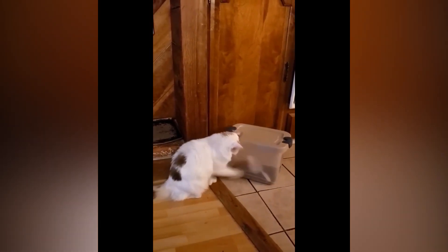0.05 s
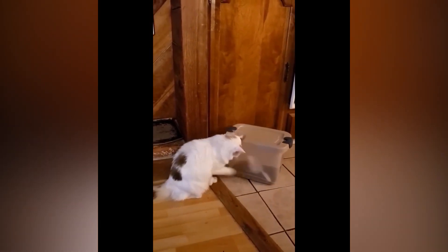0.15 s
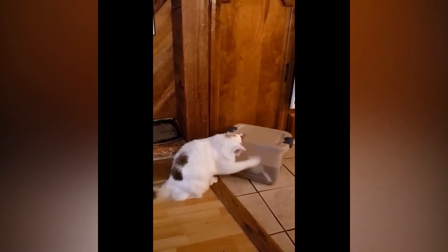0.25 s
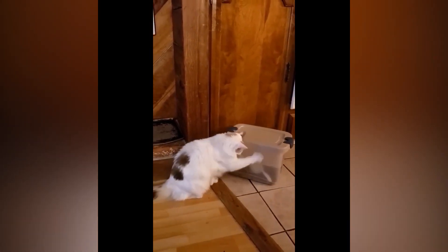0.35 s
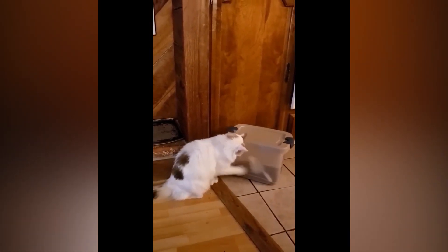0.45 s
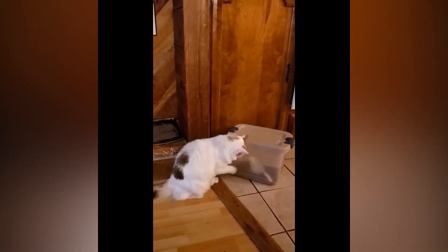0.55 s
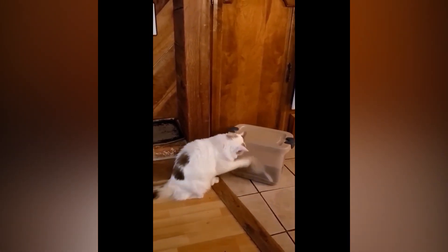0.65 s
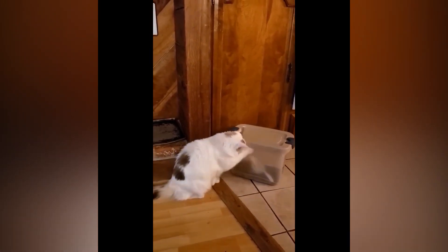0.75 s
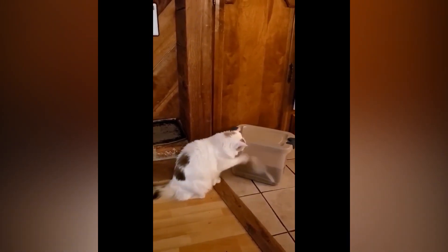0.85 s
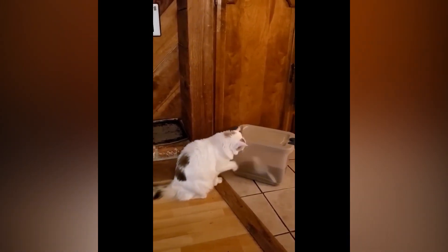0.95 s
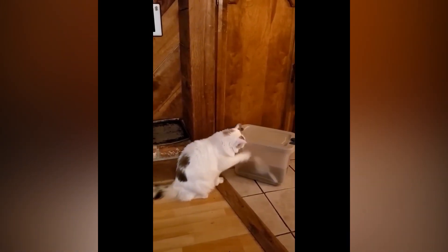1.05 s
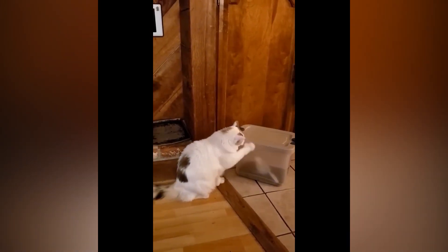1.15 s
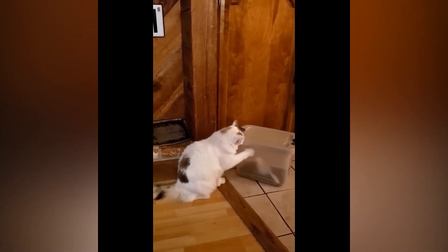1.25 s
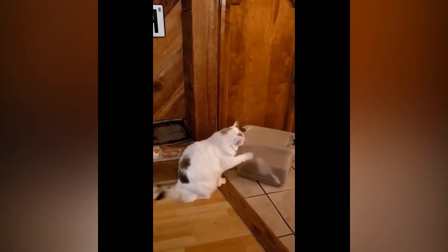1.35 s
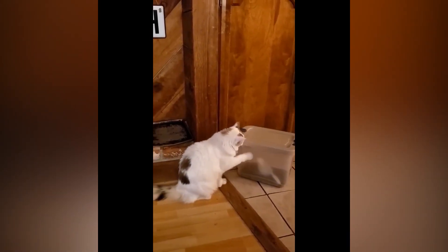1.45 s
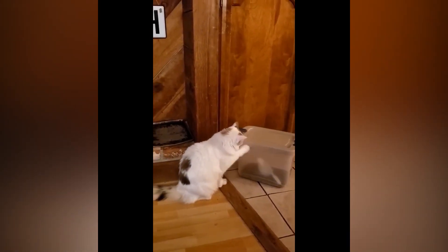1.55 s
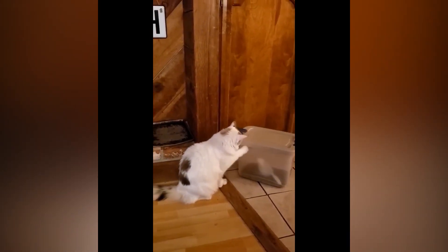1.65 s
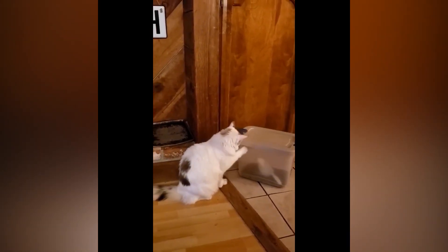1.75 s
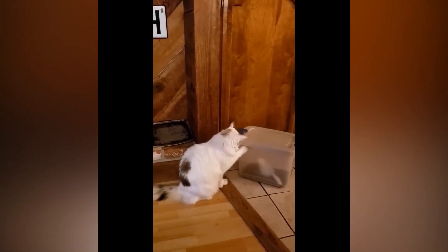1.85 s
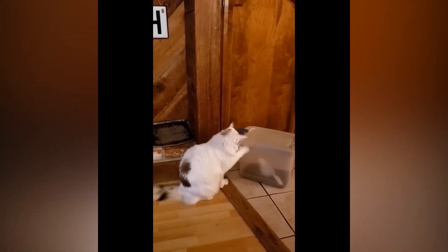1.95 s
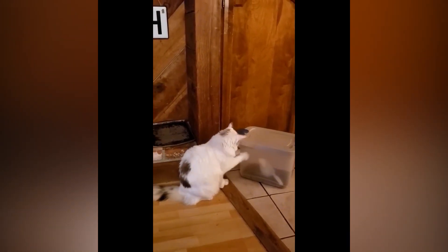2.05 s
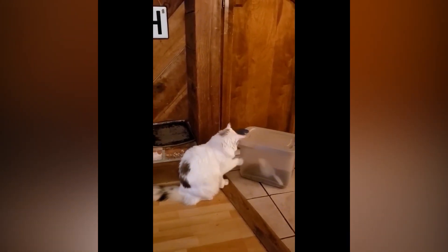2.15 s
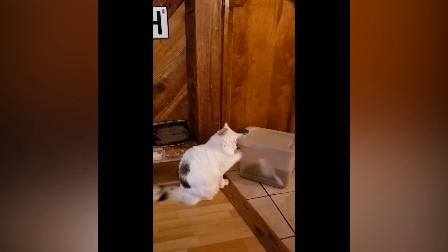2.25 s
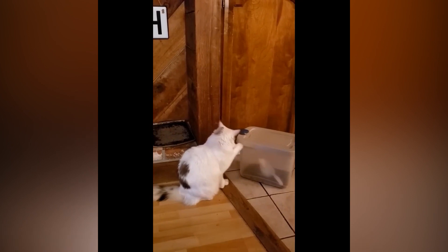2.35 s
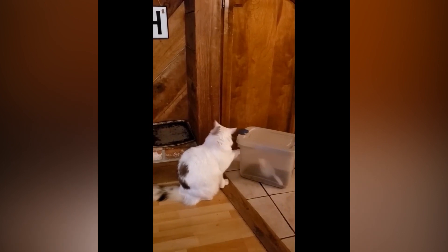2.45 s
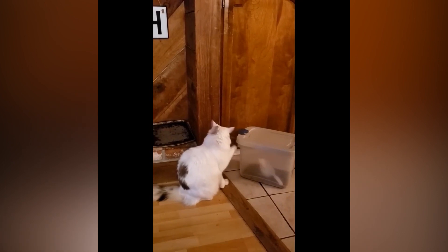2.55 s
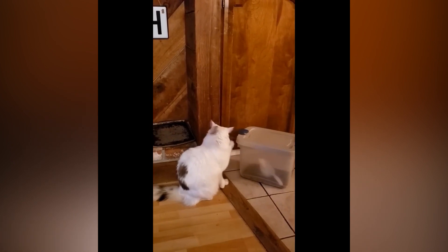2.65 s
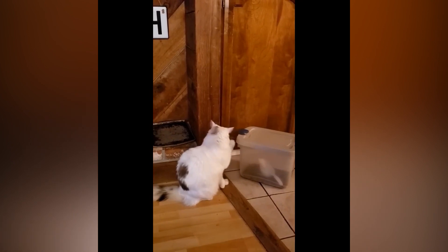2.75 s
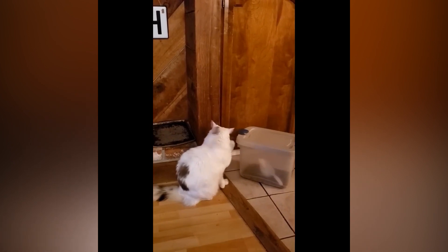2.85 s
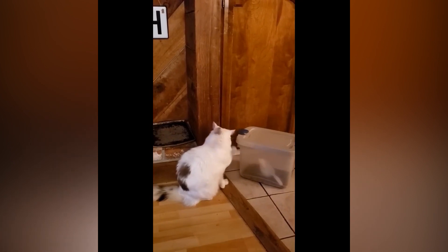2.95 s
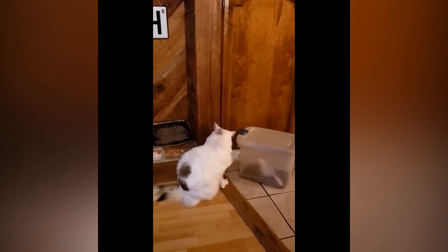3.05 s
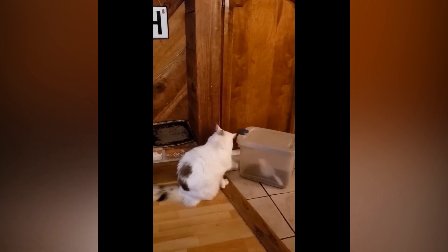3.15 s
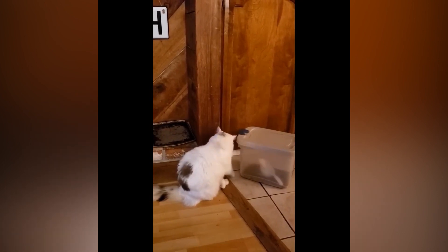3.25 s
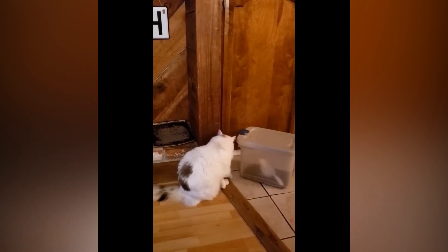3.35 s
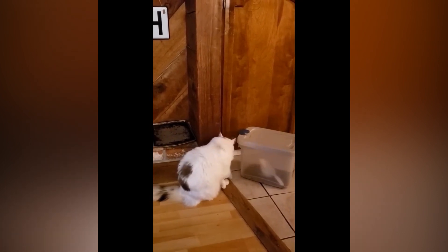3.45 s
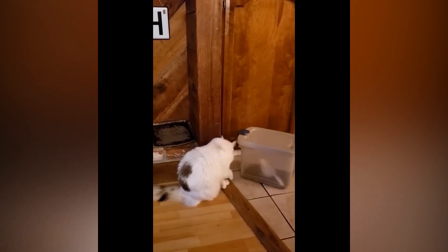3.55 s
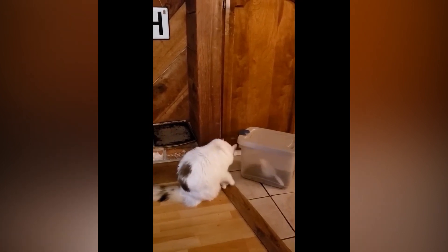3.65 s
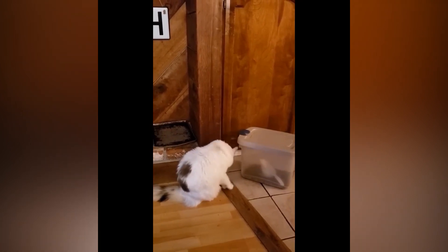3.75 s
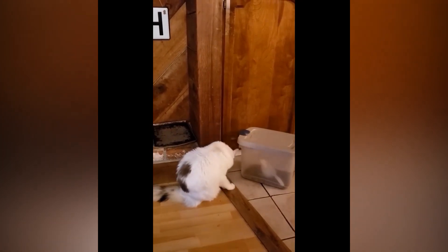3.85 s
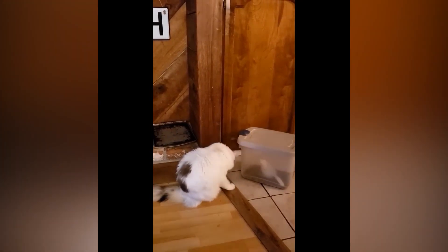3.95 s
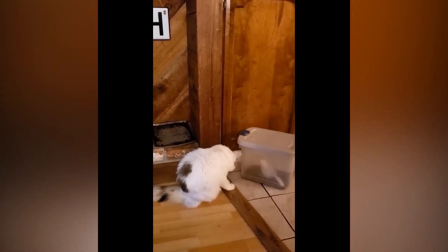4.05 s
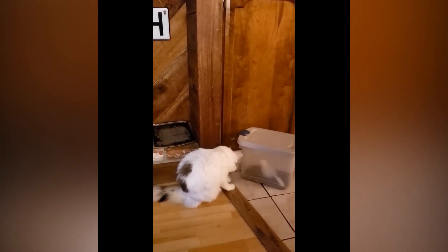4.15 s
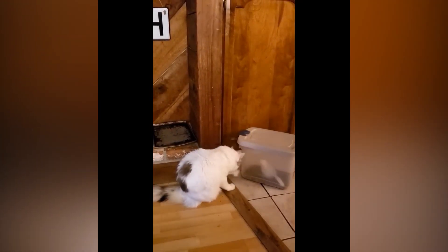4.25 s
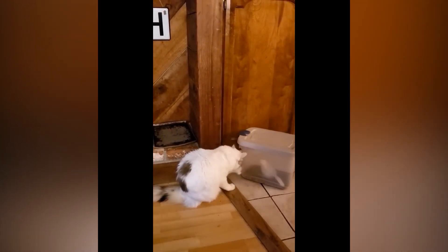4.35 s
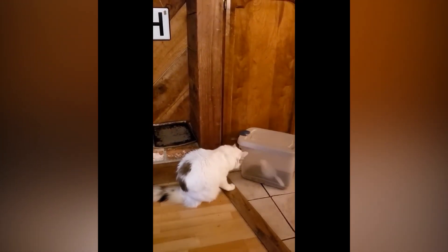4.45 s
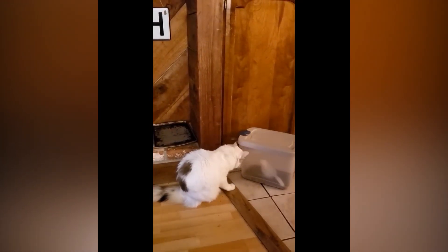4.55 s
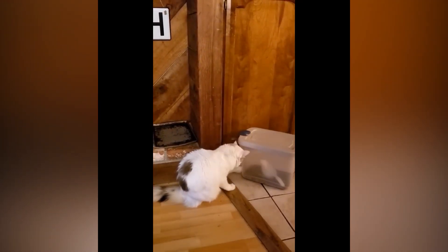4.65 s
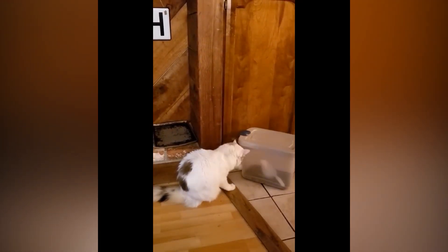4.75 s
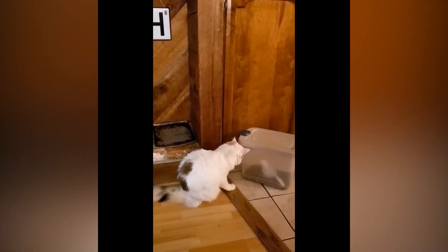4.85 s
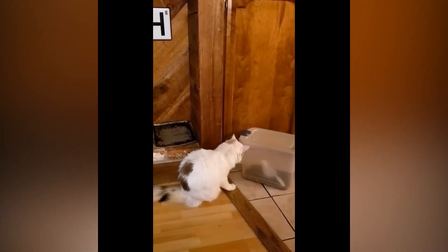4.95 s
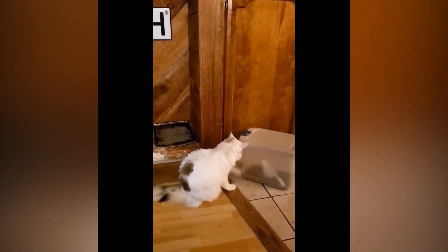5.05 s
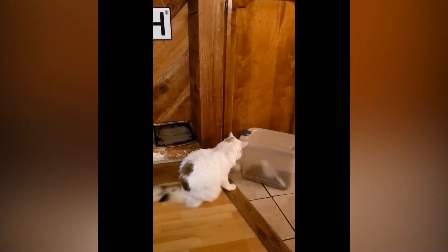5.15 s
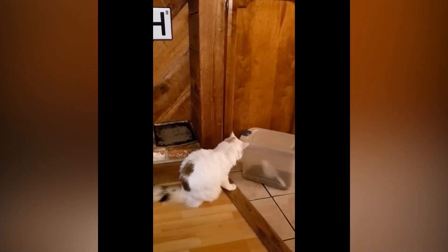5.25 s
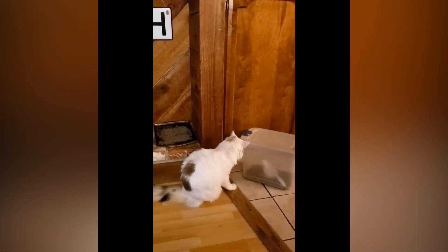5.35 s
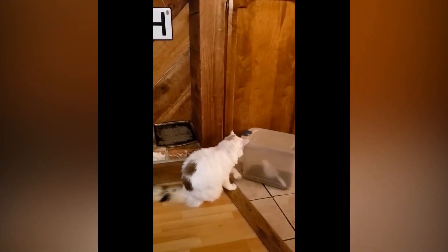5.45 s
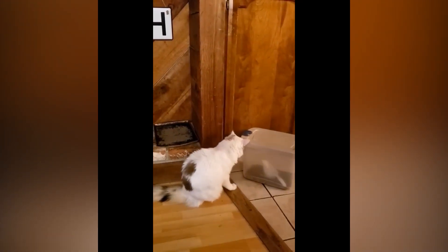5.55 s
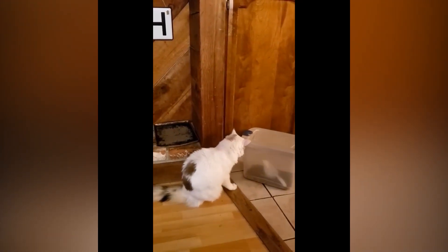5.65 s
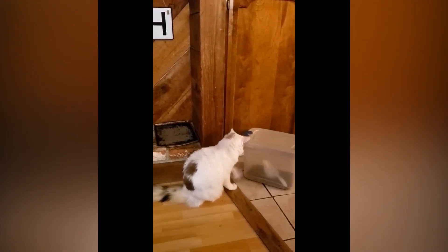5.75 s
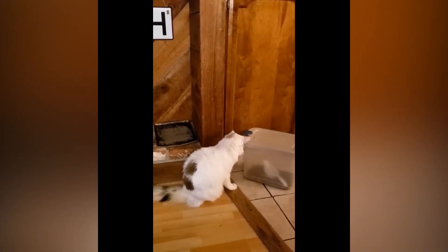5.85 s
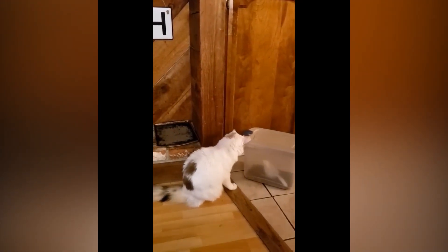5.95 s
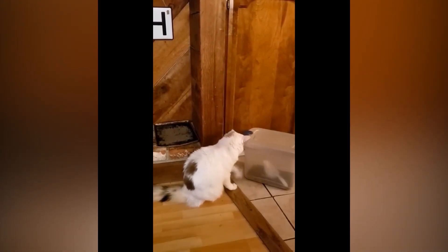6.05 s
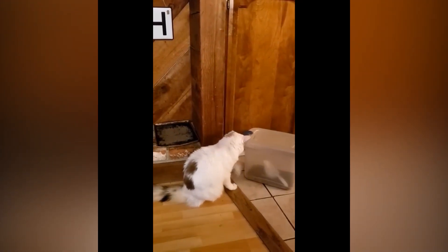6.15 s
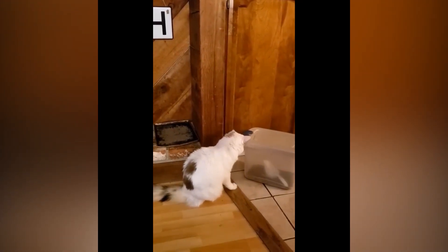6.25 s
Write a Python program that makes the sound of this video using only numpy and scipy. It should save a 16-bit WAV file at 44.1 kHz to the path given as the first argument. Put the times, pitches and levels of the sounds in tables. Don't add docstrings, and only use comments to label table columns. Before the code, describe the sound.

A cat paws a hollow plastic storage bin on a tiled floor. A rapid burst of booming knocks, claw ticks and short scrapes opens, followed by sparse taps and a near pause, then lighter blows and a sharp scratchy flurry at the end. A ventilator rushes and drones low behind. Small wood-panelled room, phone a few metres away, sound leaning left.

```python
import sys
import numpy as np
from scipy import signal
from scipy.fft import rfft, irfft
from scipy.io import wavfile
from scipy.ndimage import uniform_filter1d

SR = 44100
rng = np.random.default_rng(int(sys.argv[2]) if len(sys.argv) > 2 else 0)


def makeup_ratio(level_db):
    decades = np.asarray(level_db, float) / 20
    return 10 ** decades


def master(y):
    cut = np.clip(np.atleast_2d(y).T, -1, 1)
    pcm = np.round(cut * 32767)
    wavfile.write(sys.argv[1], SR, pcm.astype(np.int16))


N = 278269

# time_s, level_db
DRONE = [(0.0, -44), (0.09, -30.5), (0.51, -55), (0.91, -48), (1.03, -47.5), (3.37, -42.5), (3.44, -52),
         (3.9, -40), (3.99, -70.5), (4.31, -43.5), (5.11, -43.5), (5.5, -47), (5.55, -37.5), (5.82, -46.5),
         (5.92, -37.5), (6.13, -50), (6.2, -35), (6.31, -47)]
# pitch_hz, level_db
MAINS_HUM = [(120, -48), (240, -47.5)]
# pitch_hz,
# width_hz, lift_db
AIR_PEAKS = [(35.5, 10.4, 2.56), (78.2, 4.3, 5.4), (117.8, 5.8, 14), (168, 35, 5.7),
             (201.86, 36, 12.77), (240, 6.9, 3.7), (259, 1.2, 1.7), (313.5, 2.3, 1.7), (320, 3.55, 7),
             (351.2, 30, 11.66), (372, 5.4, 6.4), (460, 83, 3.32), (620.3, 1.3, 2.5), (774, 22, 7.5),
             (879.6, 17.3, 8), (1388.6, 58, 1.22), (15800, 430, 5.6)]
# freq_hz, level_db
AIR_COLOUR = [(22, -2), (40, -3.5), (70, -1), (150, 0), (300, -4), (550, -13), (1100, -19.5), (2000, -29),
              (4000, -34), (7000, -37.5), (8600, -43.5), (11000, -36), (13500, -32), (16000, -36.5)]
# freq_hz, t60_s
ROOM_T60 = [(300, 0.04), (790, 0.9), (2090, 0.4646), (5510, 0.5), (14600, 0.313)]
# freq_hz, level_db
ROOM_WET = [(150, 6), (500, -2), (1500, -2.5), (4000, 3.5), (9000, 3), (15000, 5)]
# freq_hz, balance_db
BIN_BALANCE = [(60, 7.34), (200, 5.3), (380, 7.8), (700, 11), (1290, 9), (2380, 4.8), (4400, 14.5),
               (15000, 12.96)]
AIR_BALANCE = [(60, 8.1), (110, 11.35), (200, 5.32), (380, 10.1), (700, 16.5), (1290, 8.4), (2380, 2.5),
               (4400, 2.3), (8120, 5.54), (15000, 1.43)]
# freq_hz, likeness [0-1]
LIKENESS = [(60, 1), (130, 0.96), (290, 1), (640, 0.17), (1400, 0.044), (3000, 0.011)]
# freq_hz, level_db
WALL_COLOUR = [(200, 40), (450, -4), (1000, 0), (2700, 1), (4500, -4.5), (7000, -1.5), (8500, -9.5),
               (11000, -6), (14000, -2.5), (15600, -2)]
# pitch_hz, width_hz, lift_db
WALL_MODES = [(620, 43, -1), (705, 30, 1), (973, 75, 5), (1100, 140, -4.5), (1300, 74, 1), (1700, 240, 2),
              (2580, 138, -1.5), (3800, 520, 3.85), (4500, 190, 5.5), (6560, 890, 1.5)]
BAND_HZ = [870, 2300, 5300, 11500]
SLIP_COLOUR_DB = [-4, 1.5, -4.5, -5.5]
# start_s, level_db, fade_db_per_s, sharpness_db_per_octave, mode_hz
SKIDS = [(0.024, -36.5, 201, -11, 1367), (0.151, -25, 297.5, 2, 2670), (0.162, -26, 158.5, -6, 730),
         (0.394, -32, 129, -4.5, 1830), (0.563, -33, 257, -4.5, 3050), (0.61, -40, 106, -1.5, 3100),
         (1.373, -35, 185, -3.5, 2710), (2.11, -46, 168.5, -0.5, 3480), (2.534, -47, 144, 0.5, 3730),
         (4.443, -45.5, 250, -6.5, 1726), (4.677, -42, 161.5, -6, 3480), (5.013, -43.5, 187.5, -9.5, 1440),
         (5.195, -44.5, 242.5, -11.5, 4460), (5.399, -39.5, 104, -11.5, 1380),
         (5.512, -36, 136, -5.5, 1350), (5.758, -44, 149, -18.5, 1216), (6.068, -33.5, 253, -9, 1210)]
# peak_s, level_db, swell_db_per_s, sharpness_db_per_octave, mode_hz
DRAGS = [(0.138, -41.5, 600, -3.5, 2310), (0.5, -45, 195, 1, 3920), (0.554, -38.5, 600, 3, 4420),
         (0.95, -55, 200, 3.5, 4800), (1.365, -47, 510, -1, 2700), (1.752, -39, 388, -3.5, 2954),
         (2.58, -62, 300, -2, 3900), (4.75, -55, 200, -10, 3000), (2.099, -48.5, 397, -2.5, 2400),
         (5.178, -48, 181, 1, 2830), (5.47, -70.5, 144.5, 11.5, 14000), (5.57, -44, 191, -2.5, 4430),
         (5.827, -28.5, 412.5, 5, 5700), (5.87, -32, 203.5, 0.5, 2160), (6.144, -35, 400, -1.5, 1300),
         (6.192, -35, 203.5, -1.5, 4450)]
# start_s, peak_db, pitch_hz, t60_s, swell_ms
THUMPS = [(0.019, -12, 186.3, 0.063, 4.6), (0.041, -16.5, 143, 0.041, 11), (0.067, -31.5, 172, 0.086, 13),
          (0.145, -15.5, 179.6, 0.21, 4.5), (0.167, -10.5, 167, 0.091, 6.7),
          (0.391, -20.5, 172, 0.115, 2.3), (0.423, -28, 156.2, 0.088, 6.9), (0.464, -24.5, 210, 0.033, 7.7),
          (1.371, -15.5, 178, 0.058, 5.4), (1.4, -27, 186, 0.052, 5.4), (5.011, -19, 193, 0.033, 7.3),
          (5.4, -17.5, 184, 0.051, 1.2), (5.521, -26, 174, 0.055, 9.1), (5.756, -31, 200.3, 0.067, 4.9),
          (5.805, -20.5, 189, 0.0292, 3.7), (6.069, -21, 98, 0.025, 3.7), (6.098, -26.5, 123.6, 0.075, 5.1),
          (6.157, -24, 195.5, 0.264, 1.8)]
# start_s, peak_db, pitch_hz, tip_db (above the peak)
TICKS = [(0.147, -29, 2400, -23.5), (0.408, -24, 2230, -28.5), (0.497, -28, 3970, -20.5),
         (0.5464, -21, 4440, -12), (0.56, -9, 4470, -30), (1.9027, -37, 4360, -24), (1.956, -47, 4570, -14),
         (2.113, -31, 3620, -24), (2.254, -44, 2190, -14), (2.5318, -42, 3800, -12.5),
         (5.1572, -35, 2700, -7), (5.1984, -29, 4910, -22), (5.5662, -25, 4970, 3.5),
         (5.5789, -28, 3750, -11.5), (6.1928, -25, 4300, -20)]
# start_s, knock_db, knock_hz, tick_db (above the knock)
PADS = [(0.02, -22.5, 1350, -10), (0.067, -26.5, 568, -9), (0.162, -6.5, 900, -25.5),
        (0.167, -31.5, 976, -15), (0.177, -12, 936, -12), (0.388, -14, 1475, -5.5),
        (0.611, -20.5, 1200, -14.5), (0.627, -29.5, 830, -12), (0.169, -10.5, 620, -25),
        (4.444, -45, 1080, -14), (4.675, -33, 928, -19), (5.011, -25, 990, -29), (5.195, -24, 1550, -14),
        (5.396, -16.5, 1195, -21), (5.517, -18.5, 1100, -12.5), (5.758, -18, 1210, -18),
        (6.067, -17.5, 1165, -4.5), (6.08, -28.5, 556, -16), (6.174, -22, 1039, -4)]
# start_s, knock_db, knock_hz, tick_db, tip_db (both above the knock)
CLAWS = [(0.146, -16.5, 1045, 11.5, -11), (0.153, -28.5, 1130, 7, -19), (0.407, -19.5, 1670, 3, -28),
         (0.543, -36, 1570, 12, -3), (0.563, -15, 2056, -8, 5.5), (0.567, -25.5, 1700, 15, -2.5),
         (0.926, -38.5, 1060, -4, -16), (1.372, -32, 2030, 8, -23), (1.379, -23.5, 1990, 8, -47),
         (2.11, -32, 1510, -1, -22), (5.797, -23, 2050, -19.5, -4), (5.824, -16, 1220, 4.5, 13.5),
         (6.134, -21.5, 1250, -9, -13)]

AIR_DB, SWELL_DB = -37, 2.5
DRONE_HZ, DRONE_WANDER, DRONE_FLICKER_DB = 59.65, 0.0121, 2.5
ROOM_GAP_S, ROOM_BUILD_S = 0.00033, 0.0051
RIGHT_SHADE_DB = -2
BIN_LEFT_LAG_S, AIR_RIGHT_LAG_S = 0.00005, 0.000283
SLIPS_PER_S, SLIP_SPREAD_DB, SCRAPE_DB = 5000, 2, -12
LAND_DB_PER_S, LET_GO_DB_PER_S, TREBLE_FASTER = 4000, 196.5, 0.14
SKID_MODE_DB, DRAG_MODE_DB = 0.5, -3
THUMP_DB, TAP_DB, PAD_TIP_DB, BLOW_SEND_DB = 1.5, -1.5, -24, -4
TICK_HZ, TICK_SCATTER, TICK_WIDTH = 2700, 0.089, 0.32
CHATTER_MS, SPOT_SHIFT, SPOT_DB = 0.9, 0.15, -5


def on_log(table, hz):
    freq_hz, value = np.transpose(table)
    return np.interp(np.log(np.maximum(hz, 1)), np.log(freq_hz), value)


def bins(size):
    return np.fft.rfftfreq(size, 1 / SR)


def add(track, start_s, sound):
    i = int(start_s * SR)
    track[i:i + len(sound)] += sound[:len(track) - i]


def walk(rate_hz):
    hold = int(SR / rate_hz)
    levels = np.repeat(rng.standard_normal(N // hold + 1), hold)
    slewed = uniform_filter1d(uniform_filter1d(levels, hold), hold)[:N]
    return slewed / slewed.std()


def diffuse(size):
    mid, side = rfft(rng.standard_normal((2, size)))
    likeness = np.clip(on_log(LIKENESS, bins(size)), 0, 1)
    shared = np.sqrt(1 + likeness) * mid
    opposed = np.sqrt(1 - likeness) * side * np.array([[1], [-1]])
    return (shared + opposed) / np.sqrt(2)


def ventilator():
    f, t = bins(N), np.arange(N) / SR
    lift = 1 + sum(makeup_ratio(2 * db) / (1 + (2 * (f - hz) / width) ** 2) ** 2
                   for hz, width, db in AIR_PEAKS)
    air = irfft(diffuse(N) * makeup_ratio(on_log(AIR_COLOUR, f)) * np.sqrt(lift), N)
    air *= makeup_ratio(AIR_DB) / air.std()
    rumble = irfft(rfft(air) / (1 + (f / 500) ** 4), N)
    air += rumble * (makeup_ratio(SWELL_DB * walk(6)) - 1)
    time_s, level_db = np.transpose(DRONE)
    drone_level = makeup_ratio(np.interp(t, time_s, level_db) + DRONE_FLICKER_DB * walk(9))
    drone_hz = DRONE_HZ * (1 + DRONE_WANDER * walk(3.78))
    tones = drone_level * np.sin(2 * np.pi * np.cumsum(drone_hz) / SR)
    tones += sum(makeup_ratio(db) * np.sin(2 * np.pi * hz * t) for hz, db in MAINS_HUM)
    return air + np.sqrt(2) * tones


def first_bounces():
    bounces = np.zeros((2, size := 32768))
    for port, (lag, loss) in zip([0, 1] * 4, rng.random((8, 2))):
        bounces[port, int((0.0004 + 0.004 * lag) * SR)] += makeup_ratio(-9.9 * loss)
    bounces = signal.lfilter(*signal.butter(2, 700, "high", fs=SR), bounces[:, :512])
    bounces[:, 0] += makeup_ratio(np.array([0, RIGHT_SHADE_DB]))
    return bounces


def room_tail():
    size = 32768
    t, f, noise = np.arange(size) / SR, bins(size), diffuse(size)
    late = np.maximum(t - ROOM_GAP_S, 0)
    build = 1 - np.exp(-late / ROOM_BUILD_S)
    tail = np.zeros((2, size))
    for hz in 62.5 * 2 ** np.arange(0, 8.6, 0.5):
        band = np.clip(1 - 2 * np.abs(np.log2(np.maximum(f, 1) / hz)), 0, 1)
        t60 = np.clip(on_log(ROOM_T60, hz), 0.1, 0.7)
        fade = build * np.exp(-np.log(1000) * late / t60)
        fade /= np.sqrt(np.sum(fade ** 2))
        tail += irfft(noise * band, size) * fade * makeup_ratio(on_log(ROOM_WET, hz))
    return tail


def room(direct, send):
    tail = signal.fftconvolve(send[None], room_tail(), axes=1)[:, :N]
    return signal.oaconvolve(direct[None], first_bounces(), axes=1)[:, :N] + tail


def ports(x, balance, right_lag_s):
    f = bins(N)
    ratio = makeup_ratio(-on_log(balance, f))
    right = ratio * np.exp(-2j * np.pi * f * right_lag_s)
    return irfft(rfft(x) * np.array([np.ones_like(f), right]) * 2 / (1 + ratio), N)


def resonance(hz, width, size):
    f = np.maximum(bins(size), 1)
    return 1 / (1 + 1j * (f - hz ** 2 / f) / width)


def slip_noise():
    sizes = makeup_ratio(SLIP_SPREAD_DB * np.minimum(rng.exponential(size=N), 2))
    slips = (rng.random(N) < SLIPS_PER_S / SR) * rng.standard_normal(N) * sizes
    return slips / slips.std()


def scrapes():
    slips = slip_noise()
    strokes = [(s, db, LAND_DB_PER_S, fade, sharp, hz, SKID_MODE_DB) for s, db, fade, sharp, hz in SKIDS]
    strokes += [(s, db, swell, LET_GO_DB_PER_S, sharp, hz, DRAG_MODE_DB)
                for s, db, swell, sharp, hz in DRAGS]
    slip_colour = list(zip(BAND_HZ, SLIP_COLOUR_DB))
    out, size, length = np.zeros(N), 16384, 15000
    f = np.maximum(bins(size), 1)
    for peak_s, db, swell, fade, sharp, hz, mode_db in strokes:
        start_s = max(peak_s - 0.12, 0)
        first = int(start_s * SR)
        i = np.arange(first, min(first + length, N))
        drop_db = np.where(i / SR < peak_s, swell, fade) * np.abs(i / SR - peak_s)
        drop_db += 60 * ((i - first) / length) ** 8
        spectrum = 0
        for centre in 520 * 2 ** np.arange(0, 5.1, 0.5):
            octaves = np.log2(centre / BAND_HZ[1])
            top_db = db + sharp * max(octaves, -1.1) + on_log(slip_colour, centre)
            band = np.sqrt(np.clip(1 - 2 * np.abs(np.log2(f / centre)), 0, 1))
            band /= np.sqrt(np.mean(band ** 2))
            pressure = makeup_ratio(top_db - drop_db * (1.5 + TREBLE_FASTER * octaves) + SCRAPE_DB)
            spectrum = spectrum + rfft(slips[i] * pressure, size) * band
        mode = 1 + makeup_ratio(mode_db) * resonance(hz, 0.22 * hz, size) ** 2
        add(out, start_s, irfft(spectrum * mode, size))
    return out


def ring(hz, t60, size):
    t = np.arange(size) / SR
    return np.sin(2 * np.pi * hz * t) * np.exp(-np.log(1000) * t / t60)


def thumps():
    size = 9000
    out, t_ms = np.zeros(N), np.arange(size) / SR * 1000
    for start_s, db, hz, t60, swell_ms in THUMPS:
        boom = ring(hz, t60, size)
        boom += makeup_ratio(-11.5) * ring(1.61 * hz, 0.92 * t60, size)
        boom += makeup_ratio(-17) * ring(2.1 * hz, t60, size)
        boom *= 1 - np.exp(-(t_ms / swell_ms) ** 2)
        add(out, start_s, boom / np.abs(boom).max() * makeup_ratio(db + THUMP_DB))
    return out


def strike(chance, modes):
    size, out = len(chance), 0
    t_ms = np.arange(size) / SR * 1000
    push = rfft(chance * np.exp(-t_ms / CHATTER_MS) * np.minimum(t_ms / 0.6, 1))
    for hz, width, db in modes:
        sides = sum(resonance(hz * (1 + SPOT_SHIFT) ** k, 0.73 * width, size) for k in (-3, 3))
        skirt = resonance(hz, 0.94 * hz, size) ** 2
        answer = resonance(hz, width, size) + makeup_ratio(SPOT_DB) * sides
        tick = irfft(push * answer * skirt, size)
        out = out + tick / np.abs(tick).max() * makeup_ratio(db + TAP_DB)
    return out


def taps():
    out, size = np.zeros(N), 2048
    blows = [*((*row, PAD_TIP_DB) for row in PADS), *CLAWS]
    for (start_s, db, hz, tick_db, tip_db), chance in zip(blows, rng.standard_normal((len(blows), size))):
        tick_hz = TICK_HZ * (1 + TICK_SCATTER * chance[-1])
        knock = (hz, 0.17 * hz, db)
        tick = (tick_hz, TICK_WIDTH * tick_hz, db + tick_db)
        tip = (12500, 8000, db + tip_db)
        add(out, start_s, strike(chance, [knock, tick, tip]))
    for (start_s, db, hz, tip_db), chance in zip(TICKS, rng.standard_normal((len(TICKS), size))):
        tick = (hz, TICK_WIDTH * hz, db)
        tip = (12500, 8000, db + tip_db)
        add(out, start_s, strike(chance, [tick, tip]))
    return out


def scene():
    f = bins(N)
    modes_db = sum(db / (1 + (2 * (f - hz) / width) ** 2) for hz, width, db in WALL_MODES)
    wall = makeup_ratio(on_log(WALL_COLOUR, f) + modes_db)
    blows, drags = irfft(rfft([taps(), scrapes()]) * wall, N)
    booms = thumps()
    send = makeup_ratio(BLOW_SEND_DB) * blows + drags + makeup_ratio(-7) * booms
    box = room(blows + drags + booms, send)
    return ports(box, BIN_BALANCE, -BIN_LEFT_LAG_S) + ports(ventilator(), AIR_BALANCE, AIR_RIGHT_LAG_S)


def band_limit(x):
    return signal.sosfilt(signal.butter(12, 15780, fs=SR, output="sos"), x)


def record(dry):
    rounded = np.tanh(1.587 * dry) / 1.616
    low_cut = signal.butter(2, 40, "high", fs=SR, output="sos")
    spectrum = rfft(signal.sosfilt(low_cut, rounded))
    mix = irfft(spectrum * (bins(N) < 15780), N)
    return band_limit(mix)


dry = scene()
out = record(dry)
master(out)
```